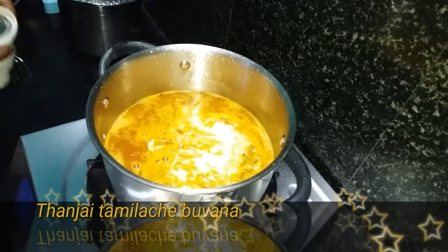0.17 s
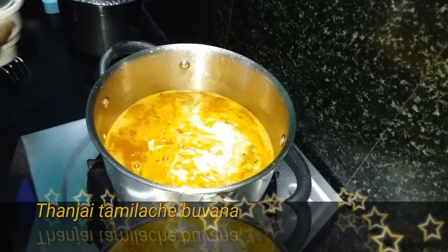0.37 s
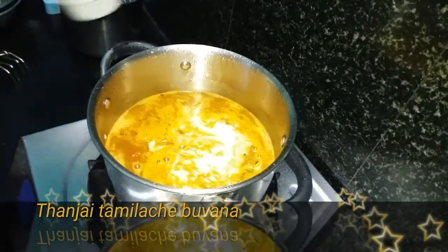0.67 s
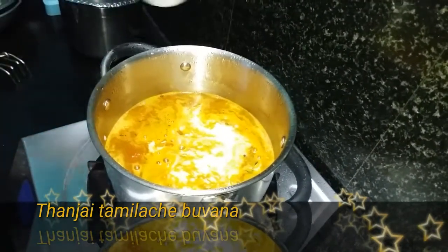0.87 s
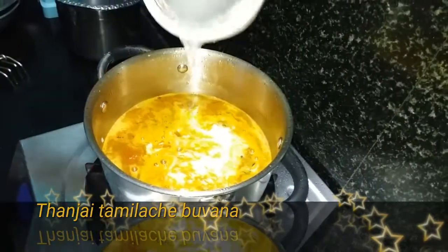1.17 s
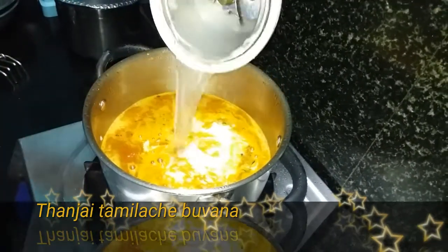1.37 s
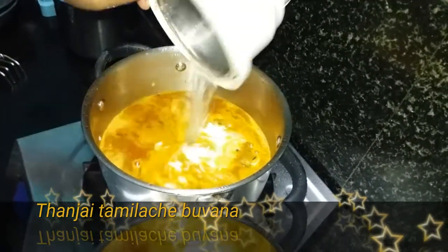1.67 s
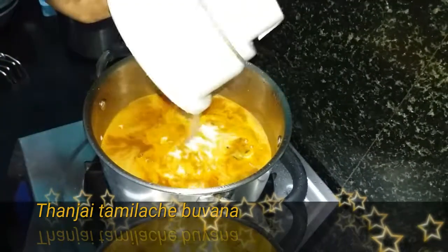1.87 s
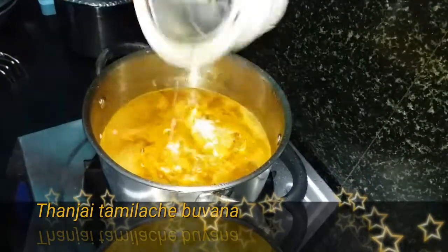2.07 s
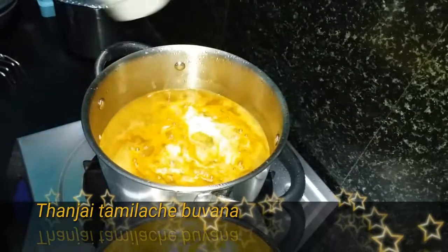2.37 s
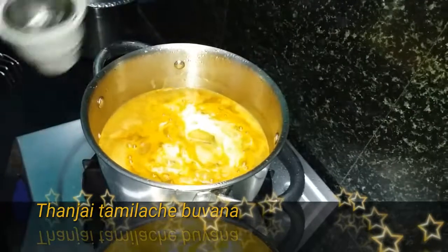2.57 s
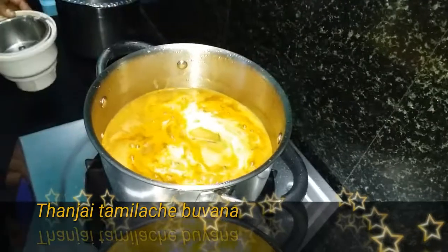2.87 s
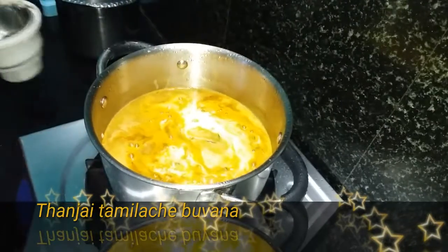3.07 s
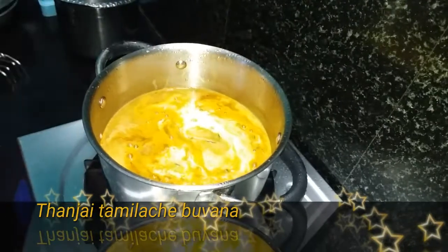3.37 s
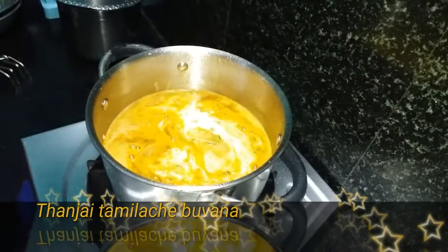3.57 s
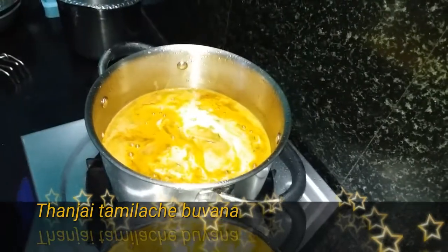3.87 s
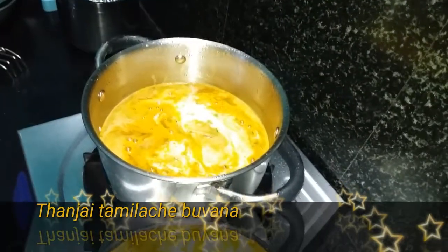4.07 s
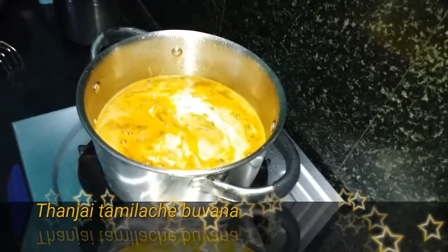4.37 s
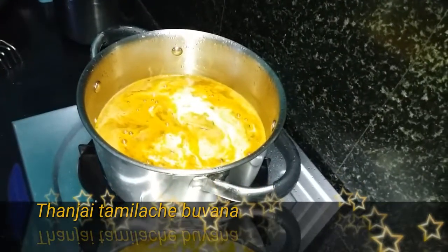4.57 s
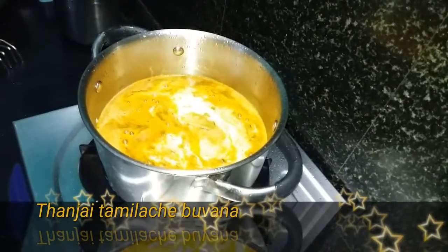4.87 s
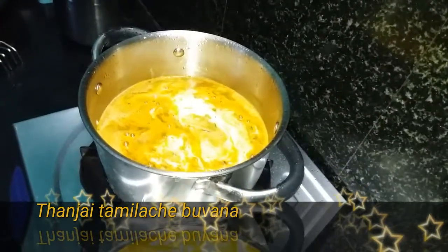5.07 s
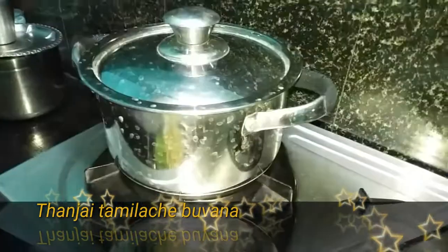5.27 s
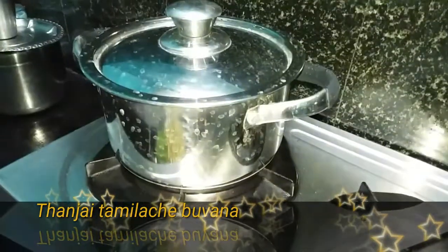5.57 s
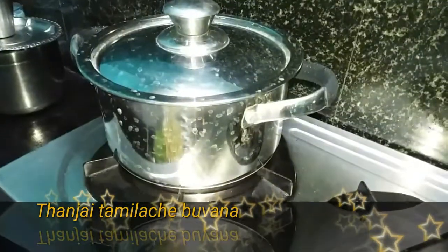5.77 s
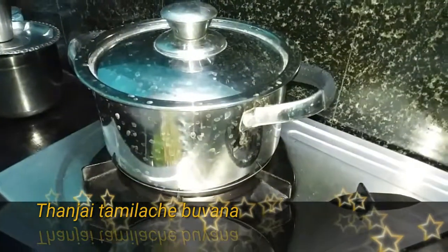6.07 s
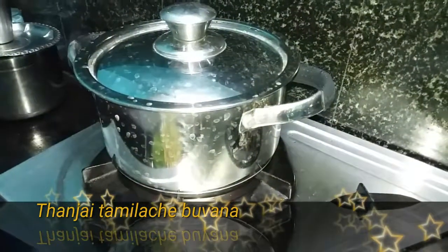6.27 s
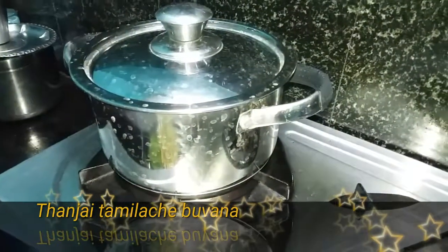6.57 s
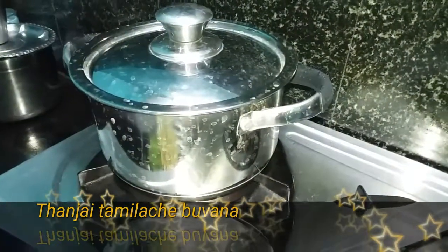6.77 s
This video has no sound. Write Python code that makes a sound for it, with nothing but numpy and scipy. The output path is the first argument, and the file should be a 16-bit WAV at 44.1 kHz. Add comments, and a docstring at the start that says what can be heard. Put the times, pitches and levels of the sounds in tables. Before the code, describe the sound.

A small, hard-walled kitchen heard close to the stove, almost centred. A gas burner makes a quiet low rumble with faint flickering simmer hiss throughout. At about 1.4 s water hits the gravy in a bright, splashing stream with separate sharp drops; it surges near 1.7 s, and deepening gulps gurgle around 1.85-1.96 s. The pour stops at 2.1 s with a last plop, and foam fizzes away. A cup is set down at 3.0 s. Utensils clink from 3.5 to 3.9 s, scrape near 4.55 s and clink again at 4.8 s, with faint, thin squeaks up to 5.1 s. A very loud dry tick snaps at 5.14 s; from 5.26 s the lidded pot simmers with a duller, slightly humming tone. A loud steel pan clatter bursts at 6.18 s with weaker rattles, then a softer plate clatter at 6.56 s. Both boom and ring briefly, leaving low rumble until about 7 s.

```python
"""Pouring water into simmering gravy

A cup of water is poured into a steel pot of gravy on a gas burner in a small hard-walled kitchen.
The burner and the simmer are filtered noise; the stream is swarms of decaying bubbles, drops and gulps.
The set-down cup, the utensils and two loud clatters of steel ware are noise bursts with ringing modes.
Thin squeaks are resonant noise. After the pour the pot simmers under its lid."""
import sys
import numpy as np
from scipy import signal
from scipy.fft import rfft, irfft
from scipy.io import wavfile
from scipy.ndimage import uniform_filter1d

SR = 44100
rng = np.random.default_rng(int(sys.argv[2]) if len(sys.argv) > 2 else 0)


def generate_wav(signal):
    """Clip the signal to [-1, 1] and save it as 16-bit WAV at the path in sys.argv[1]."""
    frames = np.transpose(np.atleast_2d(signal))
    scaled = np.clip(frames, -1, 1) * 32767
    pcm = np.round(scaled).astype(np.int16)
    wavfile.write(sys.argv[1], SR, pcm)


N = 305345  # length [samples]

STREAM_START, STREAM_END = 1.385, 2.108  # steady part of the stream [s]


def gain_of(db):
    """Level: decibels to amplitude ratio."""
    return 10 ** (np.asarray(db) / 20)


def evened(x):
    """Normalisation: scales a signal to rms 1."""
    return x / np.sqrt(np.mean(x ** 2) + 1e-20)


def read(points, hz):
    """Interpolation: reads a table on a log-frequency axis."""
    f, value = np.transpose(points)
    return np.interp(np.log(hz + 1), np.log(f + 1), value)


def add(mix, s, sound):
    """Superposition: mixes a sound in at time s, cut off at the end of the mix."""
    part = mix[max(round(s * SR), 0):][:len(sound)]
    part += sound[:len(part)]


def colour(x, spectrum, size=4096):
    """Minimum-phase filtering: the Hilbert transform of the log gain gives a causal response."""
    level_db = np.maximum(read(spectrum, abs(np.fft.fftfreq(size, 1 / SR))), -100)
    log_gain = np.log(gain_of(level_db))
    taps = np.fft.ifft(np.exp(np.conj(signal.hilbert(log_gain)))).real
    return signal.oaconvolve(x, taps[:size // 2])[:len(x)]


def whistle(modes, n):
    """Resonance: noise shaped by narrow peaks, each as wide as given at half its amplitude."""
    hz = np.fft.rfftfreq(n, 1 / SR)
    shape = sum(gain_of(db) / (1 + (2 * (hz - f) / width) ** 2) for f, width, db in modes)
    return evened(irfft(rfft(rng.standard_normal(n)) * shape, n))


def waver(n, rate):
    """Random modulation: low-frequency noise of rms 1, at half amplitude at the rate [Hz]."""
    return whistle([(0, 2 * rate, 0)], n)


def fade(start, end):
    """Linear envelope: rises after the start and sinks before the end, 50 ms each."""
    t = np.arange(N) / SR
    return np.clip(np.minimum(t - start, end - t) / 0.05, 0, 1)


def swell(start, rise, end, fall_db_per_s):
    """Exponential decay: a linear attack, a hold until the end, then a steady fall in dB."""
    t = np.arange(N) / SR
    return np.clip((t - start) / rise, 0, 1) * gain_of(-fall_db_per_s * np.maximum(t - end, 0))


def dying(x, age):
    """Reverberant decay: each frequency falls 60 dB when its age [s] reaches its decay time."""
    # decay of the kitchen: (frequency [Hz], decay time for 60 dB [s])
    decay_times = [(150, 0.31), (700, 0.52), (2200, 0.55), (5000, 0.48), (9000, 0.37), (15000, 0.48)]
    hz, t, z = signal.stft(x, SR, nperseg=256)
    frame_age = np.interp(t * SR, np.arange(len(x)), age)
    z = z * gain_of(-60 * frame_age / read(decay_times, hz)[:, None])
    return signal.istft(z, SR, nperseg=256)[1][:len(x)]


def kitchen(x, wet_db):
    """Dense reverberation: decaying noise as the echo of close hard walls, scaled to keep the power."""
    t = np.arange(SR) / SR
    tail = dying(rng.standard_normal(SR) * (t > .003), t)
    echo = signal.oaconvolve(x, tail / np.linalg.norm(tail))[:N]
    return (x + gain_of(wet_db) * echo) / np.hypot(1, gain_of(wet_db))


def band(start, end, hz, width, db):
    """Band noise: one broad resonance that fades in and out."""
    return gain_of(db) * whistle([(hz, width, 0)], N) * fade(start, end)


def hum(start, end, hz, waver_hz, db):
    """Frequency modulation: a faint tone of randomly unsteady pitch and level."""
    tone = np.sin(2 * np.pi * np.cumsum(hz + waver_hz * waver(N, 11.8)) / SR)
    return gain_of(db) * evened(tone * gain_of(3.0 * waver(N, 6.3))) * fade(start, end)


def stove():
    """Broadband noise sources: the burner rumbles and the gravy hisses; the lid recolours both."""
    # spectra of the burner, pot open and lidded: (frequency [Hz], relative level [dB])
    burner = [(25, -32), (42, -25), (55, -12), (68, -3.5), (110, 0), (170, -3), (230, -7.5), (300, -4),
              (420, -11.5), (600, -15), (850, -19.5), (1300, -20.5), (2000, -23.5), (3200, -42),
              (6000, -59)]
    burner_lidded = [(15, -54), (25, -28), (37, -25), (54, -10), (104, 2.5), (228, -2.5), (313, -1),
                     (439, -13.5), (478, -6.5), (532, -15), (831, -17), (1380, -20.5), (1780, -15.5),
                     (2560, -28), (4000, -50), (5200, -87), (8800, -120)]
    # spectra of the simmer's hiss, pot open and lidded: (frequency [Hz], relative level [dB])
    simmer = [(2000, 5.5), (2700, 0), (4000, 1), (6000, -4), (7300, 6), (8200, -1), (9100, -2.5),
              (10500, 1), (12000, 2.5), (13500, -5), (15500, -10)]
    simmer_lidded = [(2500, -9), (4000, -7.5), (4800, -9.5), (6300, -6.5), (7100, 1), (7400, -1),
                     (7900, 8.5), (8500, -7), (9300, -11), (10600, 0), (12000, -7), (13500, -12),
                     (15500, -13)]
    # burner and hiss with the pot open, before the flicker: (time [s], level [dB])
    burner_level = [(0, -52), (1.6, -50.5), (5, -49.5)]
    simmer_level = [(0, -67), (.55, -66), (.75, -60), (2.6, -68.5), (3.3, -59), (4.4, -59.5)]
    # faint hums: (start [s], end [s], pitch [Hz], rms pitch waver [Hz], level [dB])
    hums = [(0, 1.333, 429, 5.9, -61), (2.1, 4.32, 1285, 4.7, -64), (5.44, 7.015, 318.4, 10, -53)]
    lid_s = 5.26
    t = np.arange(N) / SR
    lidded = np.clip((t - lid_s) / 0.008, 0, 1)
    flame, flame_lidded, hiss, hiss_lidded = (
        evened(colour(rng.standard_normal(N), spectrum, size=16384))
        for spectrum in (burner, burner_lidded, simmer, simmer_lidded))
    open_pot = gain_of(np.interp(t, *np.transpose(burner_level))) * flame
    open_pot += gain_of(np.interp(t, *np.transpose(simmer_level))) * hiss
    closed_pot = gain_of(-48.5) * flame_lidded + gain_of(-58.5) * hiss_lidded
    out = (1 - lidded) * open_pot + lidded * closed_pot
    out *= gain_of(1.4 * waver(N, rate=4))  # the level flickers by 1.4 dB rms
    # a lower hiss with the pot open, then a narrow one under the lid
    out += band(0.57, lid_s, hz=2450, width=1200, db=-74.5)
    out += band(lid_s, np.inf, hz=1790, width=74, db=-65.5)
    # a low rumble after the clatter, thinned at the very bottom
    rumble = band(6.626, np.inf, hz=225, width=1000, db=-48)
    out += colour(rumble, [(35, -25), (90, 0)])
    return out + sum(hum(*row) for row in hums)


def tick(s, db, hz, bright_hz):
    """Damped oscillation: two brief sinusoids make one dry tick with no echo."""
    out, t = np.zeros(N), np.arange(400) / SR
    knock = np.sin(2 * np.pi * hz * t) * np.exp(-t / 0.00051)
    knock += 0.54 * np.sin(2 * np.pi * bright_hz * t) * np.exp(-t / 0.0005)
    add(out, s, gain_of(db) * knock * (1 - np.exp(-t / 0.00077)))
    return out


def squeaks():
    """Resonance: short bursts of fluttering noise in a few high modes."""
    # squeaks before the echo: (time [s], level [dB], length [s], share of the shrill mode [0-1])
    squeak_rows = [(3.482, -41.5, 0.078, 1), (4.192, -46, 0.073, 0.1), (4.81, -52, 0.1, 0.1),
                   (4.838, -40.5, 0.048, 0.11), (5.094, -43.5, 0.11, 0)]
    # resonances, plain and shrill: (frequency [Hz], width [Hz], relative level [dB])
    plain_modes = [(6280, 120, -1), (7250, 260, 14.5), (8070, 250, 9.5), (9100, 210, 5.5), (12900, 180, 3),
                   (13550, 250, -10)]
    shrill_mode = [(11450, 140, 0)]
    out = np.zeros(N)
    for s, db, length, share in squeak_rows:
        n = int(length * SR)
        tone = (1 - share) * whistle(plain_modes, n) + share * whistle(shrill_mode, n)
        fluttering = evened(tone * gain_of(3.1 * waver(n, 50)))
        add(out, s, gain_of(db) * fluttering * signal.windows.tukey(n, .25))
    return kitchen(out, wet_db=-3)


def ringing(hz, t, count=60):
    """Modal vibration: echoes make size and phase wander, and low modes take longer to build."""
    knots = np.linspace(0, t[-1], count)
    wander = 1 + .5 * (rng.standard_normal(count) + 1j * rng.standard_normal(count))
    tone = (np.interp(t, knots, wander) * np.exp(2j * np.pi * (hz * t + rng.random()))).real
    return tone / np.std(tone[:SR // 10]) * (1 - np.exp(-t * hz / 4))


def strike(blows, spectrum, modes, ring_db, crack, grain_db, ripple_db):
    """Impact excitation: a blow cracks, pings and rattles as dense noise while clear modes ring on."""
    out, t = np.zeros(N), np.arange(SR) / SR
    comb = waver(SR // 2 + 1, 180)  # many weak modes make the noise uneven in frequency
    unevenness = evened(comb - uniform_filter1d(comb, size=300))
    ripple = gain_of(ripple_db * np.tanh(2 * unevenness))
    for s, db, rise, rattle, tilt_db, ping_hz, ping_db in blows:
        age = np.hypot(t, rattle) - rattle  # rattling holds the level up before the decay
        noise = dying(irfft(rfft(rng.standard_normal(SR)) * ripple, SR), age)
        noise *= gain_of(grain_db * waver(SR, 86))
        noise = colour(noise * (1 + crack * np.exp(-t / 0.0031)), spectrum)
        ring = sum(gain_of(level - 60 * age / t60) * ringing(hz, t) for hz, level, t60 in modes)
        sound = noise / np.std(noise[:SR // 10]) + gain_of(ring_db) * ring / np.std(ring[:SR // 10])
        sound = colour(sound, [(500, 0), (16000, 5 * tilt_db)])  # five octaves
        onset = 1 - np.exp(-t / rise)
        ping = gain_of(ping_db) * np.sin(2 * np.pi * ping_hz * t) * np.exp(-t / 0.004)
        body = sound / np.std((onset * sound)[:SR // 20])
        add(out, s, gain_of(db) * onset * (body + ping))
    return out


def utensils():
    """Impact and friction: knocks start at once and brighten with force; scrapes swell and stay dull."""
    # knocks: (time [s], level [dB], rattle [s], ping [Hz], ping re the level [dB])
    knock_rows = [(3.511, -45.5, .0014, 970, 5), (3.64, -41, .002, 2200, 16),
                  (3.792, -31.5, .002, 1480, 14), (3.88, -28, 0.0031, 1510, 7),
                  (4.783, -32, .001, 3360, 10.5), (4.796, -30, 0.0012, 2200, 15)]
    # scrapes: (time [s], level [dB], rise [s], length [s])
    scrape_rows = [(3.673, -44, 0.0021, .005), (4.255, -44.5, 0.038, 0.041), (4.545, -34, 0.0052, .004),
                   (4.565, -24, 0.0052, .016)]
    # dense noise of a utensil: (frequency [Hz], relative level [dB])
    spectrum = [(150, -24), (300, -28.5), (600, -15.5), (850, -1), (1150, -13.5), (1480, -12), (1800, -8.5),
                (2300, -2.5), (2800, -16), (3600, -16), (4200, -20.5), (4700, -17.5), (5900, -29),
                (7600, -20), (8600, -31.5), (15000, -42)]
    # clear modes of a utensil: (frequency [Hz], relative level [dB], decay time for 60 dB [s])
    modes = [(769, -8, 0.42), (858, 0, 0.42), (949, -3, 0.42), (1365, -13, 0.41), (1445, -11, 0.41),
             (1545, -13, 0.41), (2024, -11, 0.4), (2151, -5, 0.4), (2189, -5, 0.4), (2291, -9, 0.4),
             (2332, -3, 0.4), (2409, -11, 0.4), (2987, -15, 0.39), (3450, -16, 0.39), (3488, -16, 0.39),
             (5463, -25, 0.37)]
    blows = []
    for s, db, rattle, ping_hz, ping_db in knock_rows:
        tilt_db = 0.49 * (db + 30.5)  # brightness [dB per octave], flat at -30.5 dB
        blows.append((s, db, .0006, rattle, tilt_db, ping_hz, ping_db))
    for s, db, rise, length in scrape_rows:
        blows.append((s, db, rise, length, -2.5, 890, 12.5))
    return strike(blows, spectrum, modes, ring_db=-2.0, crack=1.9, grain_db=2.0, ripple_db=5.0)


def cup():
    """Impact excitation: the cup is set down with a faint touch and a firmer blow."""
    # blows: (time [s], level [dB], rise [s], rattle [s], brightness [dB per octave],
    #         contact ping [Hz], ping re the level [dB])
    blows = [(2.948, -52.5, 0.0084, 0.0076, 1, 1950, 21), (3.006, -29, 0.00071, 0.0026, 0, 2000, -7)]
    # dense noise of the cup: (frequency [Hz], relative level [dB])
    spectrum = [(100, -33), (170, -15), (270, -11), (400, -12.5), (700, -12), (1200, -19.5), (2100, -7.5),
                (2800, -11), (3900, -14.5), (4800, -17.5), (5700, -27.5), (7400, -22.5), (9000, -27),
                (15000, -39)]
    # clear modes of the cup: (frequency [Hz], relative level [dB], decay time for 60 dB [s])
    modes = [(271, -4, 0.38), (339, -13, 0.38), (1423, -15, 0.37), (1990, 0, 0.37), (2165, -11, 0.36),
             (2587, -13, 0.36), (3301, -15, 0.35), (3817, -11, 0.35), (4791, -20, 0.34), (7353, -24, 0.32)]
    return strike(blows, spectrum, modes, ring_db=1.0, crack=1.0, grain_db=-1.0, ripple_db=1.5)


def pan():
    """Modal vibration: the first clatter, a loud blow on a steel pan and two weaker ones."""
    # blows: (time [s], level [dB], rise [s], rattle [s], brightness [dB per octave],
    #         contact ping [Hz], ping re the level [dB])
    blows = [(6.179, -12.5, 0.003, 0.054, 0.51, 1380, 2), (6.33, -33, 0.031, 0.029, -0.029, 7000, -6),
             (6.38, -41, 0.016, .005, -0.13, 1350, 4)]
    # dense noise of the pan: (frequency [Hz], relative level [dB])
    spectrum = [(70, -58), (130, -17), (250, -0.5), (360, -7.5), (600, 1), (900, -6.5), (1350, -4.5),
                (1700, -9), (2300, -8), (3000, -13.5), (4500, -10), (5900, -12.5), (7200, -8), (9500, -10),
                (11800, -13.5), (12700, -17), (15500, -28)]
    # clear modes of the pan: (frequency [Hz], relative level [dB], decay time for 60 dB [s])
    modes = [(258, -11, 0.45), (508, -3, 0.45), (596, -2, 0.45), (620, -3, 0.45), (645, -5, 0.45),
             (1312, -5, 0.47), (1384, -8, 0.47), (1972, -10, 0.48), (3142, -16, 0.46), (5331, -13, 0.41),
             (6330, -12, 0.39), (6918, -3, 0.38), (6940, -7, 0.38), (6963, -8, 0.38), (7359, -5, 0.36),
             (8287, -10, 0.32), (8308, 0, 0.32), (8335, -5, 0.32), (8836, -11, 0.3), (8865, -8, 0.3),
             (9442, -11, 0.29), (9475, 0, 0.29), (9545, -11, 0.28), (10172, -14, 0.28), (10201, -11, 0.28),
             (12427, -15, 0.26), (12603, -14, 0.25), (12629, -13, 0.25), (12766, -12, 0.25),
             (13865, -19, 0.25)]
    return strike(blows, spectrum, modes, ring_db=1, crack=0.19, grain_db=0.0, ripple_db=4.5)


def plate():
    """Modal vibration: the second clatter, a blow on a steel plate and a faint one after it."""
    # blows: (time [s], level [dB], rise [s], rattle [s], brightness [dB per octave],
    #         contact ping [Hz], ping re the level [dB])
    blows = [(6.56, -22.5, 0.0019, 0.011, 0.21, 3700, -3), (6.668, -50, 0.0022, .005, 0, 480, 21)]
    # dense noise of the plate: (frequency [Hz], relative level [dB])
    spectrum = [(70, -34), (130, 0), (230, -12), (330, 2), (620, -2.5), (900, -4.5), (1900, -8.5),
                (2900, -12.5), (4700, -10), (5700, -10.5), (7200, -4), (9000, -6), (13300, -13.5),
                (15500, -32)]
    # clear modes of the plate: (frequency [Hz], relative level [dB], decay time for 60 dB [s])
    modes = [(319, -9, 0.42), (502, -9, 0.42), (594, 0, 0.42), (625, -5, 0.42), (730, -8, 0.42),
             (2454, -17, 0.38), (4552, -16, 0.35), (4912, -14, 0.34), (6161, -9, 0.32), (6716, -11, 0.31),
             (6943, -6, 0.3), (7275, -3, 0.3), (7365, -6, 0.3), (7856, -10, 0.3), (9633, -14, 0.29),
             (10943, -16, 0.29), (11654, -17, 0.28), (12111, -13, 0.28), (13270, -11, 0.28),
             (13365, -14, 0.28)]
    return strike(blows, spectrum, modes, ring_db=1.5, crack=0.18, grain_db=-0.4, ripple_db=4)


def booms():
    """Low resonance: the worktop booms just after each clatter and dies away."""
    # booms: (time [s], level [dB])
    boom_rows = [(6.235, -37.5), (6.575, -39)]
    rise = 0.025
    level = sum(gain_of(db) * swell(s, rise, s + rise, fall_db_per_s=130) for s, db in boom_rows)
    return level * whistle([(113, 23, 0)], N)


def bubble(hz, cycles, glide):
    """Bubble resonance: a trapped air pocket rings, its pitch rising as it nears the surface."""
    u = np.arange(int(6 * cycles * SR / hz) + 4) * hz / SR / cycles  # time in decay constants
    envelope = np.exp(-u) * (1 - np.exp(-u * cycles * 2))
    return envelope * np.sin(2 * np.pi * cycles * u * (1 + glide * u))


def bubbling(lo_hz, hi_hz, per_s, cycles, spread_db, count=60):
    """Random superposition: a swarm of bubbles of many pitches, a few of them much louder."""
    out = np.zeros(N)
    for hz in np.geomspace(lo_hz, hi_hz, count):
        strength = gain_of(spread_db * np.minimum(rng.exponential(1, N), 4))
        births = rng.random(N) < per_s / count / SR
        out += signal.oaconvolve(strength * births, hz * bubble(hz, cycles, 0.024))[:N]
    return out


def flow():
    """Power addition: trickle, stream, surges and foam set the strength of spray and of churning."""
    # surges as the stream lands and as the cup is tipped right over:
    # (start [s], rise [s], hold [s], spray level [dB], churning level [dB])
    surge_rows = [(1.387, 0.0061, 0.06, -37, -38), (1.724, .13, 0.072, -29.5, -45)]
    start, end = STREAM_START, STREAM_END
    rise_s, fall = 0.011, 69  # fall [dB/s]
    stream = swell(start, rise_s, end, fall)
    trickle = swell(1.362, rise_s, start, fall)  # lands just ahead of the stream
    # foam builds up during the pour and fizzes away afterwards
    foam = swell(start - .03, end - start, end, fall_db_per_s=25.5)
    spray = [gain_of(-41) * stream, gain_of(-41) * foam, gain_of(-51) * trickle]
    churn = [gain_of(-44.5) * stream]
    for s, rise, hold, spray_db, churn_db in surge_rows:
        haste = np.sqrt(0.15 / rise)  # quick surges ebb quickly
        spray.append(gain_of(spray_db) * swell(s, rise, s + rise + hold, haste * 51))
        churn.append(gain_of(churn_db) * swell(s, rise, s + rise + hold, haste * 75))
    return np.linalg.norm(spray, axis=0), np.linalg.norm(churn, axis=0)


def drop(hz, size=1500):
    """Impact and bubble resonance: a drop slaps the surface and traps a tiny ringing bubble."""
    # slap of a middling drop: (frequency [Hz], relative level [dB])
    slap_spectrum = [(200, -26), (1000, -2), (2000, -12), (3500, -4), (6000, -4.5), (8000, 2.5), (12000, 0),
                     (15500, -8)]
    age = np.arange(size) / SR
    bulk = 7300 / hz  # bigger drops ring lower and slap deeper and harder
    slap = evened(colour(rng.standard_normal(size), [(f / bulk, db) for f, db in slap_spectrum]))
    out = gain_of(-5.5) * np.sqrt(bulk) * slap * np.exp(-age / 0.0028)
    add(out, 0, gain_of(-2.0) * bubble(hz, cycles=9.8, glide=0.012))
    return out


def spatter(strength, count=36):
    """Random impacts: small drops, one in each 1/22 s, follow the strength of the spray."""
    out = np.zeros(N)
    for k, (when, size, pitch) in enumerate(rng.random((count, 3))):
        s = STREAM_START + (k + when) / 22
        size_db = 6 - (2 * size - 1)  # 5 to 7 dB re the spray
        add(out, s, gain_of(size_db) * drop(np.interp(pitch, (0, 1), (4000, 11900))))
    return out * strength


def gurgle(count=5):
    """Bubble resonance: a nearly even run of gulps (s, dB, Hz), each deeper and louder than the last."""
    times = np.linspace(1.852, 1.962, count) + 0.00283 * rng.standard_normal(count)
    return list(zip(times, np.linspace(-25.5, -23, count), np.geomspace(478, 407, count)))


def pour():
    """Bubble acoustics: the stream makes fine spray and deep churning; drops and gulps stand out."""
    # spectra of spray and churning: (frequency [Hz], relative level [dB])
    spray_spectrum = [(590, -40), (1000, 12.5), (1080, -4.5), (1350, -9.5), (1640, -5), (1940, -8),
                      (2800, -6), (3700, -7), (4050, -8), (4440, -4), (6120, -8.5), (7270, -1), (12200, -5),
                      (15500, -13)]
    churn_spectrum = [(76, -31), (130, -23), (162, -3.5), (205, -13), (310, -9), (422, -5.5), (652, -9),
                      (765, -8.5), (2000, -23), (2600, -47), (4400, -120)]
    # biggest drops, before the echo: (time [s], level [dB], pitch [Hz])
    drop_rows = [(1.3935, -24.5, 5200), (1.418, -18, 6830), (1.448, -20, 4480), (1.467, -17, 6040),
                 (1.4838, -16, 7960), (1.573, -20.5, 7500), (1.6422, -20, 7400), (1.687, -23, 11800),
                 (1.701, -12, 7700), (2.0645, -14.5, 6900), (2.3107, -25.5, 7800)]
    # big air pockets dragged under, before the echo: (time [s], level [dB], pitch [Hz])
    gulp_rows = [(1.393, -24.5, 640), (1.447, -25.5, 1330), (1.70, -29.5, 483), (2.066, -29.5, 420.4),
                 (2.069, -23, 813)]
    spray_gain, churn_gain = flow()
    fine_swarm = bubbling(1122, 14900, per_s=3000, cycles=8.3, spread_db=2.0)
    deep_swarm = bubbling(148.0, 2170, per_s=1500, cycles=2.54, spread_db=3.0)
    out = evened(colour(fine_swarm, spray_spectrum)) * spray_gain
    out += evened(colour(deep_swarm, churn_spectrum)) * churn_gain
    out += spatter(spray_gain)
    for s, db, hz in drop_rows:
        add(out, s, gain_of(db) * drop(hz))
    for s, db, hz in gulp_rows + gurgle():
        add(out, s, gain_of(db) * bubble(hz, cycles=4.05, glide=0.0097))
    return kitchen(out, wet_db=-4.0)


def scene():
    """Superposition: all sources add into one signal, copied to two channels."""
    mono = stove() + tick(s=5.144, db=-5, hz=860, bright_hz=1920) + squeaks()
    mono += utensils() + cup() + pan() + plate() + booms() + pour()
    return np.array([mono, mono])


def record(dry):
    """Linear filtering: the two channels differ in treble colour; then a low-pass limits the band."""
    # first channel re the second: (frequency [Hz], level difference [dB])
    channel_difference = [(1500, 0), (2500, -.5), (3600, -4.6), (4800, -8.8), (5700, -10), (7000, -6.7),
                          (8200, -.4), (9000, .9), (10000, 3.2), (12000, 2), (13200, 0)]
    ratio = gain_of(read(channel_difference, np.fft.rfftfreq(N, 1 / SR)))
    balance = np.array([ratio, np.ones_like(ratio)]) * 2 / (1 + ratio)  # the mean gain stays 1
    coloured = irfft(rfft(dry) * balance, N)
    low_pass = signal.firwin(255, 15550, window=("kaiser", 9), fs=SR)  # cutoff [Hz]
    return signal.oaconvolve(coloured, low_pass[None], "same")


dry = scene()
out = record(dry)
generate_wav(out)
```